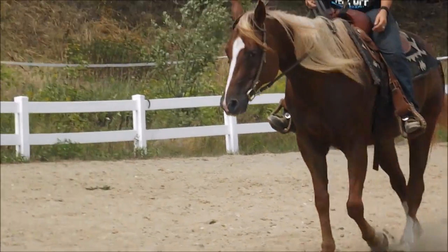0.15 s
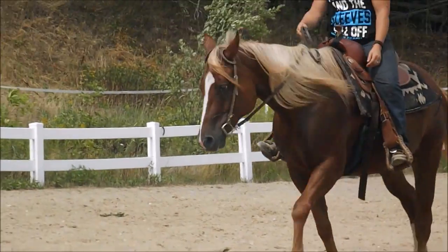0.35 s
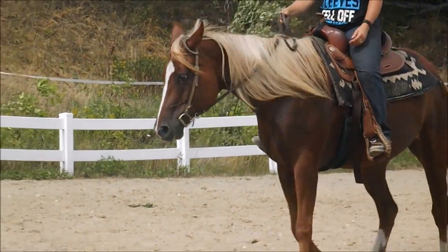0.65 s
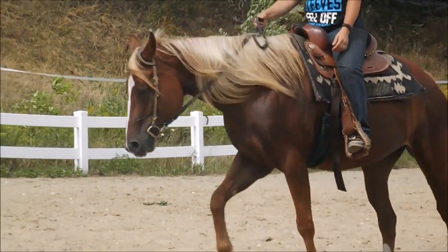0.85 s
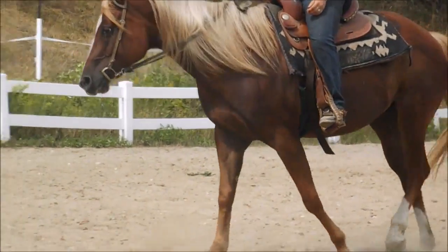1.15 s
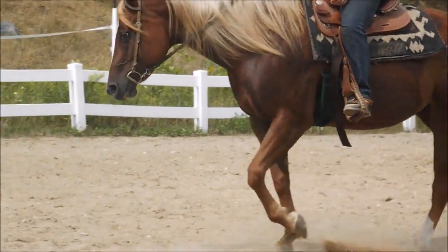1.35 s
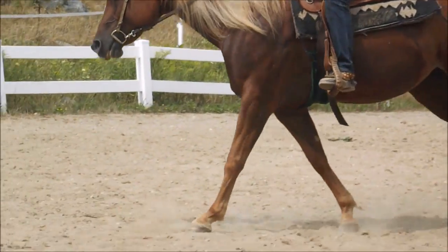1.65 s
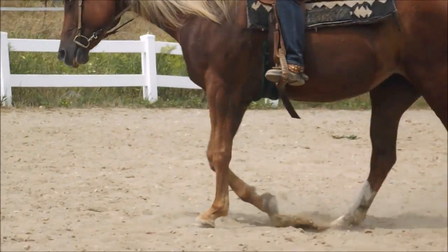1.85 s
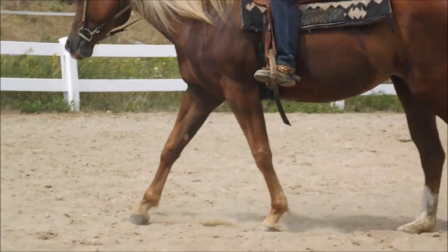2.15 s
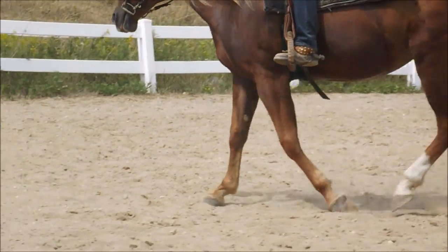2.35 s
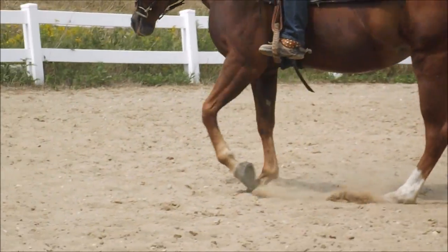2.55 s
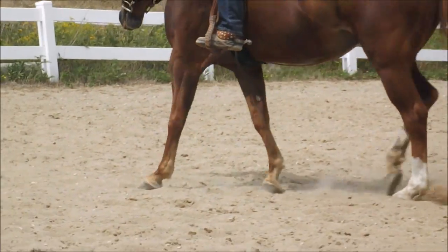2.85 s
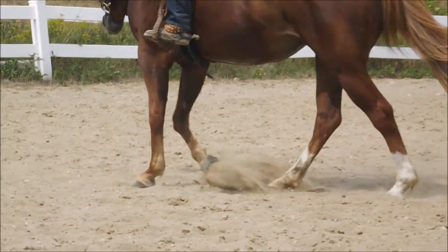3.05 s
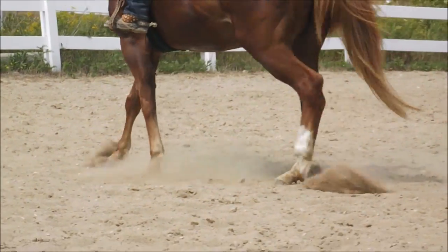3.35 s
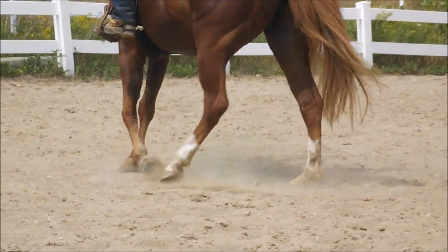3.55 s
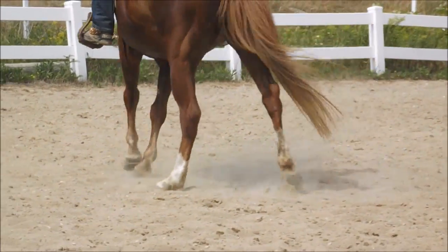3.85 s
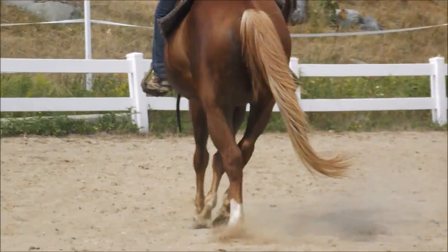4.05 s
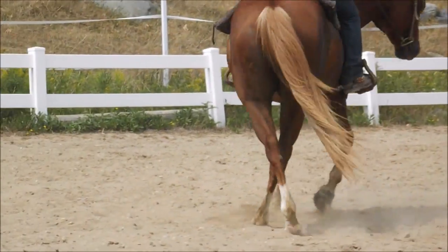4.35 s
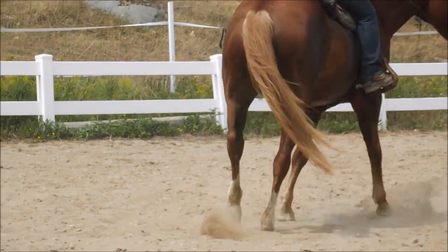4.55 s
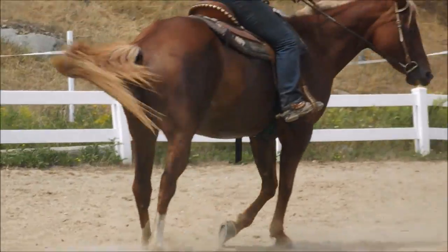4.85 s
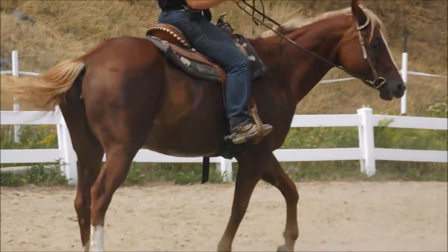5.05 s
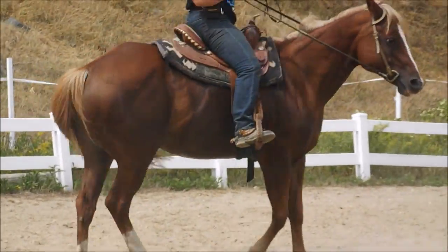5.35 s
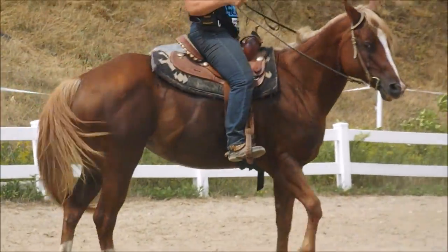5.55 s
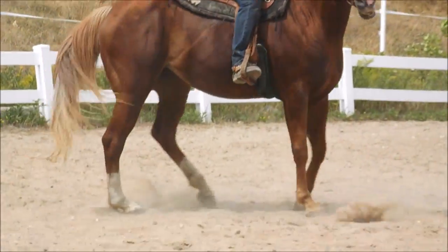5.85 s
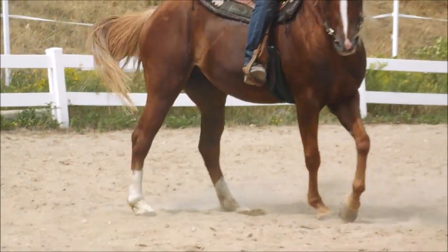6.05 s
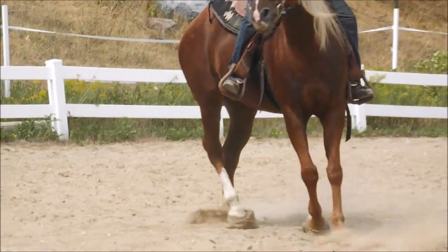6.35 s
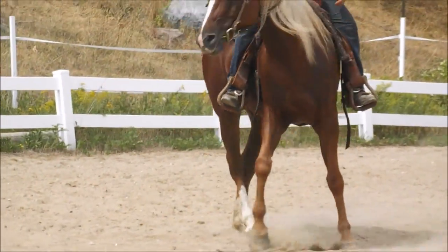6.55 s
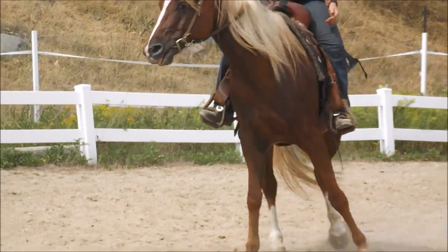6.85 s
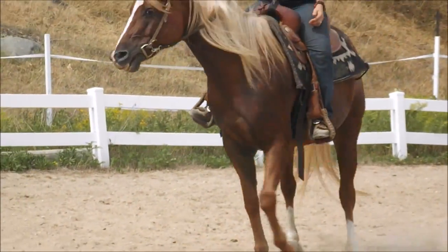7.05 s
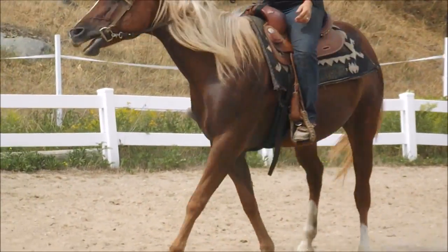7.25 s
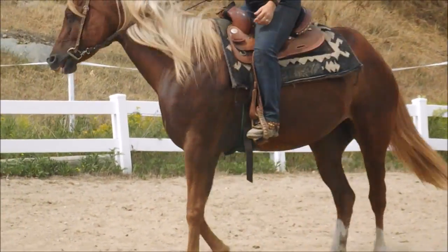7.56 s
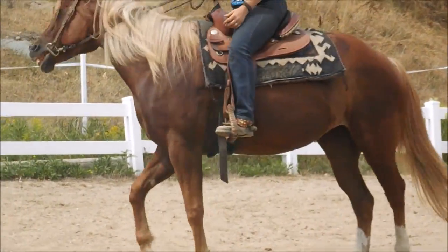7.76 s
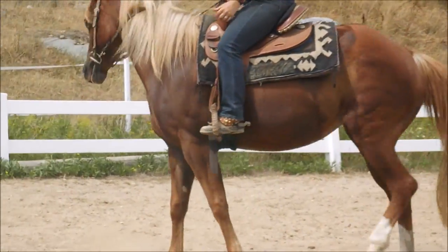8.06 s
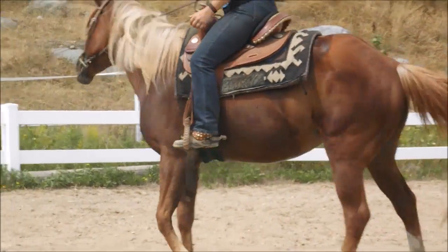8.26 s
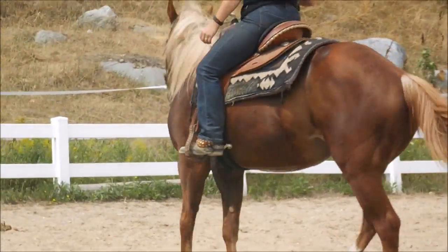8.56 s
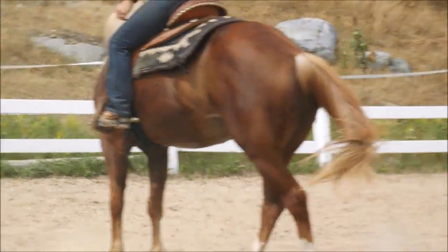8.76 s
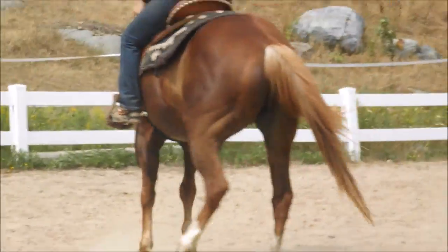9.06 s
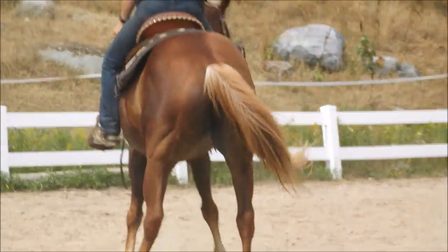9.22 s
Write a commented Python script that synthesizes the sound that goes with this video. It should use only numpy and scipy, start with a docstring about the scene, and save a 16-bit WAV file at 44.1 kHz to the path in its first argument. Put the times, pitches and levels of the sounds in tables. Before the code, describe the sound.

Outdoors in a sand arena, a ridden horse walks with faint, dull hoof puffs, a few heavier near the start. Shrill insects and recorder hiss form a steady high bed. Low breeze buffets the microphone early on; later, sharp close clicks and a loud knock break in, then a rattle with leather creaks near the end.

```python
"""Horse in a sand arena

A ridden horse walks round an outdoor sand arena: each hoof makes a soft puff of filtered, decaying noise.
Insects shrill in the dry grass as narrow bands of noise; a camera adds hiss, resonant whirr and thin tones.
A breeze rumbles and puffs at the microphone. Close clicks and rattles, probably handling of the camera, are
noise bursts ringing in modes; leather creaks and short tonal noise swells join them, and the loudest
sounds make the gain control duck."""
import sys
import numpy as np
from scipy import signal
from scipy.fft import rfft, irfft
from scipy.io import wavfile

SR = 44100
rng = np.random.default_rng(int(sys.argv[2]) if len(sys.argv) > 2 else 0)


def master_out(mix):
    """Clip the mix to full scale and print it as 16-bit PCM to the path in sys.argv[1]."""
    frames = np.transpose(np.atleast_2d(mix))
    ceiling = np.clip(frames, -1, 1)
    pcm = np.round(ceiling * 32767).astype(np.int16)
    wavfile.write(sys.argv[1], SR, pcm)


N = 414099
TIME = np.arange(N) / SR   # [s]
FREQ = np.fft.rfftfreq(N, 1 / SR)   # [Hz]


def from_db(db):
    """Logarithmic level: decibels become an amplitude gain."""
    return 10 ** (np.asarray(db) / 20)


def rms_one(x):
    """Normalization: scale to a root-mean-square of 1."""
    return x / np.sqrt(np.mean(x ** 2) + 1e-20)


def in_time(rows):
    """Linear interpolation between (time [s], value) rows."""
    return np.interp(TIME, *np.transpose(rows))


def shaped_noise(gain):
    """Spectral shaping: white noise takes the given gain at each frequency; rms 1."""
    spectrum = rfft(rng.standard_normal(N)) * gain
    return rms_one(irfft(spectrum, N))


def coloured_noise(points):
    """Coloured noise: its spectrum joins (frequency [Hz], relative density [dB per Hz]) points; rms 1."""
    hz, db = np.transpose(points)
    return shaped_noise(from_db(np.interp(np.log(FREQ + 1), np.log(hz), db)))


def drift(rate):
    """Random modulation: straight lines join `rate` chance values per second; rms 1."""
    knots = rng.standard_normal(4000)
    return rms_one(np.interp(TIME * rate, np.arange(len(knots)), knots))


def resonate(x, hz, width_hz):
    """Damped resonance: two poles, with a gain of about 1 at the peak."""
    r = np.exp(-np.pi * width_hz / SR)
    numerator = np.array([1, 0, -1]) * (1 - r * r) / 2
    return signal.lfilter(numerator, [1, -2 * r * np.cos(2 * np.pi * hz / SR), r * r], x)


def narrow(x, hz, width_hz):
    """Cascaded resonance: two in a row give steep skirts, each widened to offset the narrowing."""
    once = resonate(x, hz, 1.4 * width_hz)
    return resonate(once, hz, 1.4 * width_hz)


def band(x, low_hz, high_hz, order=2):
    """Band limitation by a Butterworth band-pass."""
    return signal.sosfilt(signal.butter(order, [low_hz, high_hz], "band", fs=SR, output="sos"), x)


def add(out, s, sound):
    """Superposition: mix a sound in at time s."""
    start = int(s * SR)
    out[start:start + len(sound)] += sound[:N - start]


def swells(noise, rows):
    """Gaussian envelopes: (time [s], half length [s], level at the top of the bell [dB]) rows."""
    out = np.zeros(N)
    for s, half_length, db in rows:
        near = np.abs(TIME - s) < 4 * half_length
        bell = np.exp(-.5 * ((TIME[near] - s) / half_length) ** 2)
        burst = rms_one(noise[near] * bell) * np.sqrt(np.mean(bell ** 2))
        out[near] += from_db(db) * burst
    return out


def bumps(rows):
    """Gaussian gain changes away from 1: (time [s], half length [s], change [dB]) rows."""
    return from_db(sum(db * np.exp(-.5 * ((TIME - s) / half_length) ** 2) for s, half_length, db in rows))


# colour of the steady hiss: (frequency [Hz], relative density [dB per Hz])
HISS_COLOUR = [(50, -19), (180, -2.5), (330, 0), (600, -5), (1000, -2), (1900, -6.5), (2900, 0),
               (3650, -6.5), (4300, 9), (5400, 4.5), (7700, -7.5), (10800, -4.5), (11400, -16.5),
               (15700, -26)]
# resonances of the camera body: (frequency [Hz], width [Hz], mean level [dB rms])
WHIRR_MODES = [(65.7, 27, -64.5), (498.7, 29, -64), (1061, 10.5, -65), (1249, 34, -59.5), (1379, 32, -63),
               (1506.5, 50, -60.5), (2215, 90, -60), (2625, 42, -56.5), (3326, 260, -50.5),
               (3895, 83, -53.5), (10480, 260, -61), (12040, 360, -65), (12150, 450, -88),
               (13950, 300, -76)]
# thin electronic tones: (frequency [Hz], level [dB rms])
WHINE_TONES = [(6820, -63), (7219, -61), (8021, -66)]
# hiss and whirr sink for a moment: (time [s], half length [s], change [dB])
CAMERA_LULL = [(4.53, 0.23, -3)]


def camera(hiss_db=-40):
    """Resonant filtering: noise excites the case as a hollow whirr, beside hiss and phase-wavering tones."""
    running = rng.standard_normal(N)
    whirr = sum(from_db(db + drift(10)) * rms_one(narrow(running, hz, width))
                for hz, width, db in WHIRR_MODES)
    whine = sum(from_db(db) * np.sqrt(2) * np.sin(2 * np.pi * hz * TIME + drift(20))
                for hz, db in WHINE_TONES)
    hiss = from_db(hiss_db) * coloured_noise(HISS_COLOUR)
    return (hiss + whirr) * bumps(CAMERA_LULL) + whine


def chorus(groups, flutter_db, flutters_per_s):
    """Incoherent addition: many far insects blur into a narrow noise band with a random flutter."""
    out = 0
    for hz, spread_hz, db in groups:
        singers = shaped_noise(np.exp(-((FREQ - hz) / (2 * spread_hz)) ** 2))
        flutter = from_db(flutter_db * drift(flutters_per_s))
        out = out + from_db(db) * rms_one(singers * flutter)
    return out


# both choruses: (frequency [Hz], spread between singers [Hz], level before wander and falters [dB rms])
LOW_SINGERS = [(4595, 80, -40.5), (4923, 186, -41)]
HIGH_SINGERS = [(6360, 190, -45.5), (6980, 214, -45.5)]
# the high chorus falters: (time [s], half length [s], change [dB])
HIGH_FALTERS = [(1.47, 0.23, -2.5), (3.47, 0.056, -6), (4.38, 0.11, -6), (4.85, 0.12, -3),
                (6.38, 0.051, -6), (7.35, .15, -2)]


def insects(low_wander_db=0.8, high_wander_db=0.55, wanders_per_s=8.4):
    """Amplitude modulation: both choruses wander a little by chance, and the higher one falters."""
    low = chorus(LOW_SINGERS, flutter_db=1.5, flutters_per_s=60)
    low = low * from_db(low_wander_db * drift(wanders_per_s))
    high = chorus(HIGH_SINGERS, flutter_db=1.44, flutters_per_s=40)
    high = high * from_db(high_wander_db * drift(wanders_per_s))
    return low + high * bumps(HIGH_FALTERS)


# strength of the breeze: (time [s], level before the rumble gain and turbulence [dB])
BREEZE_STRENGTH = [(0.0, -50), (0.68, -48.5), (1.39, -52.5), (1.67, -48), (1.83, -44), (2.17, -49.5),
                   (2.77, -45), (2.93, -50), (3.29, -43.5), (3.43, -49), (3.87, -45), (4.29, -52),
                   (5.18, -49.5), (5.41, -56), (6.09, -60), (6.85, -54), (7.37, -62), (9.39, -57)]
# colour of rumble and eddies: (frequency [Hz], relative density [dB per Hz])
RUMBLE_COLOUR = [(15, 0.5), (30, 4.5), (55, -2), (85, -5), (130, -10), (200, -18), (400, -36), (1000, -47)]
# puffs of air on the microphone: (time [s], half length [s], level [dB])
AIR_PUFFS = [(1.779, 0.0059, -26), (1.814, 0.0033, -25.5), (1.863, .0091, -27), (1.898, 0.028, -24.5),
             (5.153, 0.0087, -25), (5.19, .027, -35.5)]
# colour of the puffs: (frequency [Hz], relative density [dB per Hz])
AIR_PUFF_COLOUR = [(20, -24), (50, -1.5), (95, -7), (160, -10), (230, -23.5), (350, -28), (600, -54),
                   (1500, -70)]


def wind(rumble_db=5, turbulence_db=1.5, turbulence_per_s=22, eddy_s=0.033, eddy_db=-16):
    """Turbulence: low noise follows the breeze, and air puffs sit in longer, deeper, weaker eddies."""
    level_db = in_time(BREEZE_STRENGTH) + rumble_db + turbulence_db * drift(turbulence_per_s)
    rumble = from_db(level_db) * coloured_noise(RUMBLE_COLOUR)
    eddy_rows = [(s, eddy_s, db + eddy_db) for s, _, db in AIR_PUFFS]
    eddies = swells(coloured_noise(RUMBLE_COLOUR), eddy_rows)
    puffs = swells(coloured_noise(AIR_PUFF_COLOUR), AIR_PUFFS)
    return rumble + eddies + puffs


# leather creaks: (time [s], half length [s], level [dB], frequency [Hz], width [Hz])
LEATHER_CREAKS = [(8.257, 0.022, -37.5, 1670, 500), (8.361, 0.017, -31.5, 910, 250),
                  (8.56, 0.011, -35, 1510, 700), (8.859, 0.0077, -40, 1190, 250),
                  (9.004, 0.006, -42, 1150, 119), (9.085, 0.0076, -38.5, 1105, 101),
                  (9.284, 0.0041, -40, 1310, 120)]


def leather(slips_per_s=1200):
    """Frictional slip: quick uneven slips excite one resonance per creak."""
    slips = rng.standard_normal(N) * (rng.random(N) < slips_per_s / SR) + 1e-18
    return sum(swells(narrow(slips, hz, width), [(s, half_length, db)])
               for s, half_length, db, hz, width in LEATHER_CREAKS)


# three short tonal noise swells after the rattle: (time [s], half length [s], level [dB])
TONAL_SWELLS = [(8.806, 0.0041, -19), (8.8157, 0.0039, -17), (8.827, 0.0052, -20.5)]
# narrow bands of the swells: (frequency [Hz], width [Hz], relative level [dB])
SWELL_BANDS = [(1560, 120, -5.5), (2080, 47, -2.5), (2650, 180, -4.5), (3600, 77, 2.5), (3960, 160, -4),
               (4150, 150, 0.5), (4530, 350, -7), (8370, 310, -1), (9850, 140, -2)]


def tonal_swells():
    """Resonant filtering: noise in narrow bands swells briefly three times."""
    noise = rng.standard_normal(N)
    tonal = sum(from_db(db) * rms_one(narrow(noise, hz, width)) for hz, width, db in SWELL_BANDS)
    return swells(tonal, TONAL_SWELLS)


# light clicks, then heavy knocks that shake every range at once, both as
# (time [s], contact length [s], level of a range at the centre [dB over 10 ms], centre [Hz])
LIGHT_CLICKS = [(5.684, 0.00049, -24, 2700), (5.696, 0.0016, -23.5, 3550), (6.288, 0.0013, -12.5, 5030),
                (7.129, 0.0023, -35.5, 1100), (8.2635, 0.00046, -34, 5900), (8.312, 0.0019, -21, 2350),
                (8.333, 0.0029, -41, 700), (8.5486, 0.0019, -26.5, 1230), (8.658, 0.0027, -33.5, 750),
                (8.7881, 0.0013, -17.5, 5200), (8.7944, 0.0011, -15, 5160), (8.8, .0007, -23, 5400),
                (8.844, .003, -32, 600)]
HEAVY_KNOCKS = [(5.7726, .0015, -14.5, 2200), (8.3467, 0.00218, -28, 1000), (8.3516, 0.0032, -25, 2000)]
# soft gritty crunches: (time [s], level of a range at the centre [dB over 10 ms], centre [Hz])
GRITTY_CRUNCHES = [(.951, -38.5, 5900), (.975, -41, 200), (1.052, -31.5, 5000), (1.071, -39, 1600),
                   (1.146, -35.5, 4000), (1.164, -39, 700), (1.284, -41.5, 596), (7.196, -43.5, 1500),
                   (9.156, -37, 3500), (9.233, -38, 5000), (9.326, -41, 6000)]


def contacts(click_fall=7, knock_fall=2, crunch_fall=2.5, crunch_s=0.005):
    """Spectral spread: light clicks fall [dB per octave] fastest away from their centre, knocks slowest."""
    return ([(*row, click_fall) for row in LIGHT_CLICKS]
            + [(*row, knock_fall) for row in HEAVY_KNOCKS]
            + [(s, crunch_s, db, hz, crunch_fall) for s, db, hz in GRITTY_CRUNCHES])


# ranges of thump, knock, ring and snap: (low edge [Hz], high edge [Hz])
CONTACT_RANGES = [(70, 380), (430, 1250), (1250, 2300), (2300, 15000)]
# what the clicking parts ring with: (frequency [Hz], width [Hz], relative level [dB rms])
CONTACT_MODES = [(203, 350, 2.5), (400, 36, -8.5), (833, 15, -13), (1045, 188, -1), (1454, 27, 2.5),
                 (1782, 134, 8), (2097, 27, -0.5), (2620, 84, 8), (3860, 840, 16.5), (5240, 570, -8),
                 (6030, 160, 6), (8200, 470, -2), (9100, 800, 2)]


def clicks(tail_db=-22, tail_s=.028, grain_db=3, crack_db=-1, hard_db=-19, db_per_octave=13,
           ring_cycles=11, strike_db=23, strike_s=0.0018):
    """Impact excitation: a brief burst of tiny slips rings the modes, range by range."""
    out, t = np.zeros(N), TIME[:SR // 12]
    range_hz = np.sqrt(np.prod(CONTACT_RANGES, axis=1))
    for s, length, level_db, centre_hz, fall_db in contacts():
        levels_db = level_db - fall_db * np.abs(np.log2(range_hz / centre_hz))
        slips, sizes, rustle = rng.standard_normal((3, len(t)))
        age = 1.6 * t / length
        contact = slips * from_db(grain_db * sizes) * age * np.exp(1 - age)
        # short contacts land with one clean strike
        contact[int(length * SR / 2)] += from_db(strike_db) * np.exp(-length / strike_s)
        # outdoors, the rustle after each contact dies quickly
        tail = band(rustle, 320, 3300) * from_db(tail_db) * np.exp(-t / tail_s)
        body = sum(from_db(db) * rms_one(resonate(contact + tail, hz, width))
                   for hz, width, db in CONTACT_MODES)
        body = body + from_db(crack_db) * rms_one(contact)   # the bare crack fills the gaps between modes
        # a harder hit is brighter
        top_hz = np.clip(12000 * 2 ** ((levels_db[-1] - hard_db) / db_per_octave), 3500, 12500)
        body = signal.sosfilt(signal.butter(2, top_hz, fs=SR, output="sos"), body)
        for (low, high), db in zip(CONTACT_RANGES, levels_db):
            ring_down = np.exp(-t * low / (2 * ring_cycles))   # high ranges die sooner
            part = band(body, low, high, order=3) * ring_down
            energy = np.cumsum(part ** 2)
            onset_s = np.argmax(energy > energy[-1] / 20) / SR   # all ranges speak together
            rms_10_ms = np.sqrt(energy[-1] / (SR / 100))   # all the energy, as if spread over 10 ms
            add(out, s - onset_s, from_db(db) * part / rms_10_ms)
    return out


# heavier footfalls: (time [s], level before attack and decay [dB], decay [s], top of the band [Hz])
HEAVY_FOOTFALLS = [(.204, -39, 0.082, 397), (.471, -49.5, 0.23, 244), (.69, -43.5, 0.079, 780),
                   (.77, -46.5, 0.073, 250), (1.0, -40.5, 0.096, 377), (2.719, -47, 0.14, 343),
                   (2.89, -44, .08, 255), (3.131, -49, .13, 824), (3.36, -47, 0.088, 240),
                   (3.779, -47.5, .07, 800), (5.399, -50, .12, 1200), (7.226, -41.5, .022, 1330),
                   (7.259, -40, 0.014, 547), (7.885, -43.5, .029, 1200), (7.923, -40, 0.02, 415),
                   (8.769, -31.5, 0.034, 1010), (9.205, -41.5, 0.065, 1450)]


def walk(step_s=.33, uneven_s=.03, step_db=-52, spread_db=0.5, decay_s=0.035, top_hz=500):
    """Quasi-periodic gait: faint footfalls, slightly uneven in time and weight."""
    return [((k + 1) * step_s + uneven_s * late, step_db + spread_db * weight, decay_s, top_hz)
            for k, (late, weight) in enumerate(rng.standard_normal(size=(28, 2)))]


def hooves(attack_s=0.0015, grain_db=3, usual_low_hz=162, usual_top_hz=500, low_follows=0.43,
           grit_db=-9, grit_low_hz=450, grit_top_hz=1600):
    """Granular damping: sand gives way under each hoof in a dull, decaying puff with a little grit on top."""
    out, t = np.zeros(N), TIME[:SR // 2]
    for s, db, decay_s, top_hz in list(HEAVY_FOOTFALLS) + walk():
        grains, sizes = rng.standard_normal((2, len(t)))
        sand = grains * from_db(grain_db * sizes)
        # a brighter puff has less bass
        low_hz = min(usual_low_hz * (top_hz / usual_top_hz) ** low_follows, .8 * top_hz)
        puff = rms_one(band(sand, low_hz, top_hz))
        grit = from_db(grit_db) * rms_one(band(sand[::-1], grit_low_hz, grit_top_hz))
        envelope = (1 - np.exp(-t / attack_s)) * np.exp(-t / decay_s)
        if 0 <= s < TIME[-1]:
            add(out, s, from_db(db) * (puff + grit) * envelope)
    return out


def scene():
    """Superposition of the surroundings, the close sounds and the horse, in mono."""
    surroundings = camera() + insects() + wind()
    handling = clicks() + tonal_swells()
    return (surroundings + handling + leather() + hooves())[None]


def gain_control(x, threshold_db=-9, release_db_per_s=50, attack_s=0.013, depth=0.28):
    """Dynamic compression: peaks over the threshold pull the gain down; it then creeps back."""
    over = np.maximum(20 * np.log10(np.abs(x) + 1e-9) - threshold_db, 0)
    release = release_db_per_s * TIME
    held = np.maximum.accumulate(over + release, axis=-1) - release
    r = np.exp(-1 / (attack_s * SR))
    smooth = signal.lfilter([1 - r], [1, -r], held)
    return x * from_db(-depth * smooth)


def record(dry, cutoff_hz=15750):
    """Limited range: gain control, overload where peaks still pass full scale, and a steep top cut."""
    loud = np.clip(gain_control(dry), -1, 1)
    return signal.sosfilt(signal.ellip(12, .1, 100, cutoff_hz, fs=SR, output="sos"), loud)


dry = scene()
out = record(dry)
master_out(out)
```